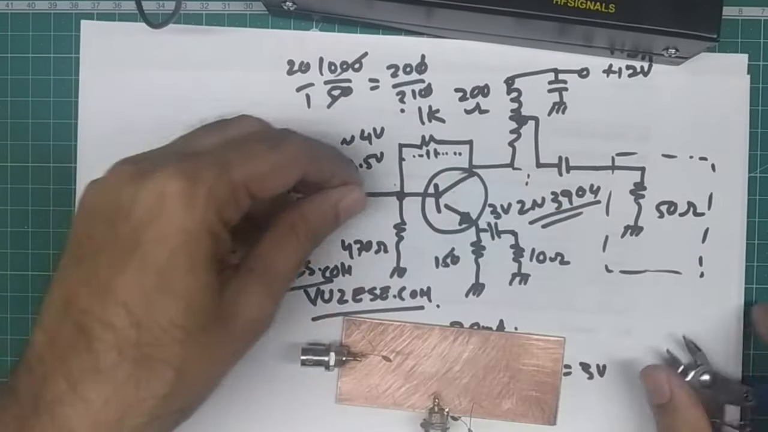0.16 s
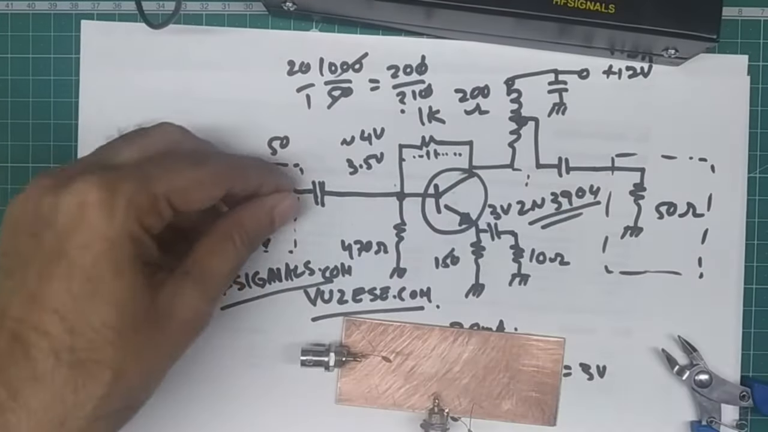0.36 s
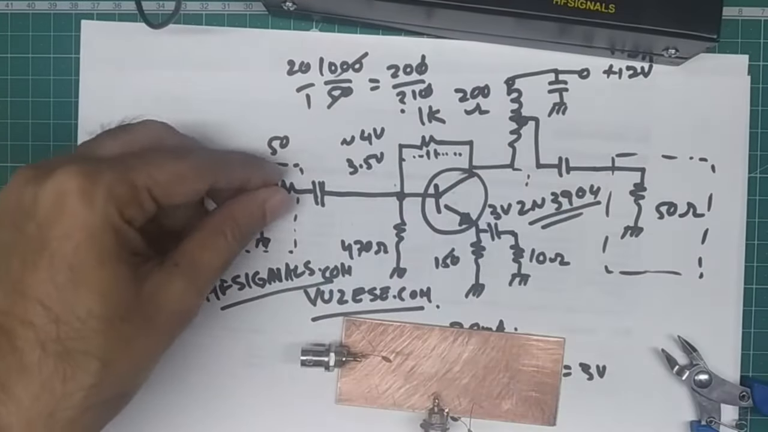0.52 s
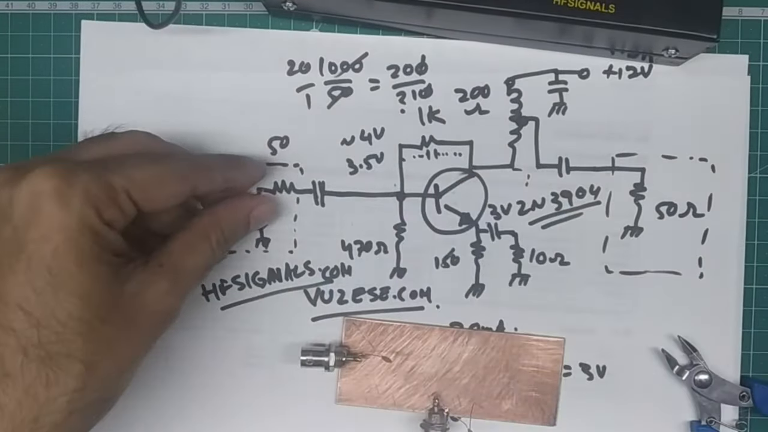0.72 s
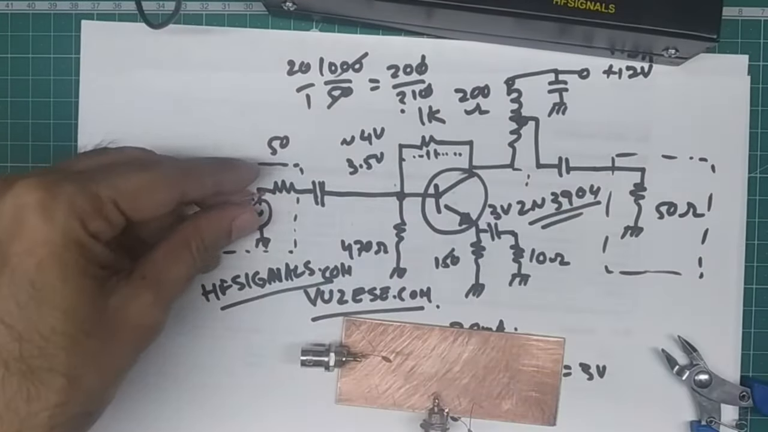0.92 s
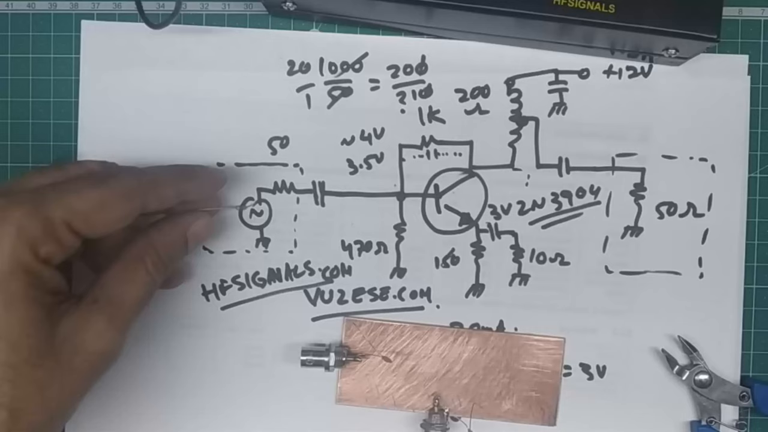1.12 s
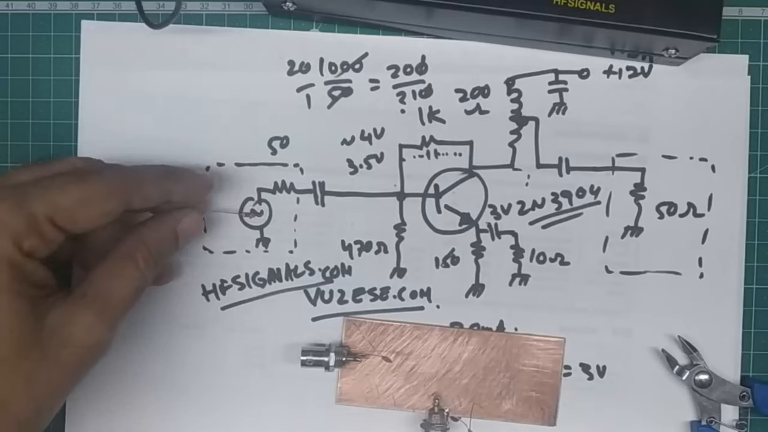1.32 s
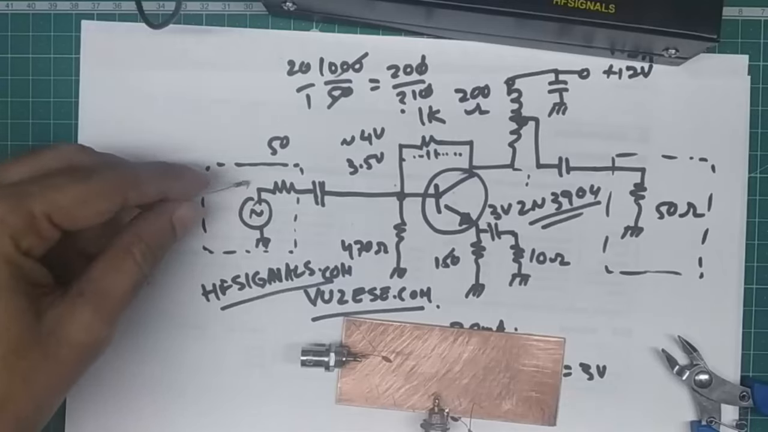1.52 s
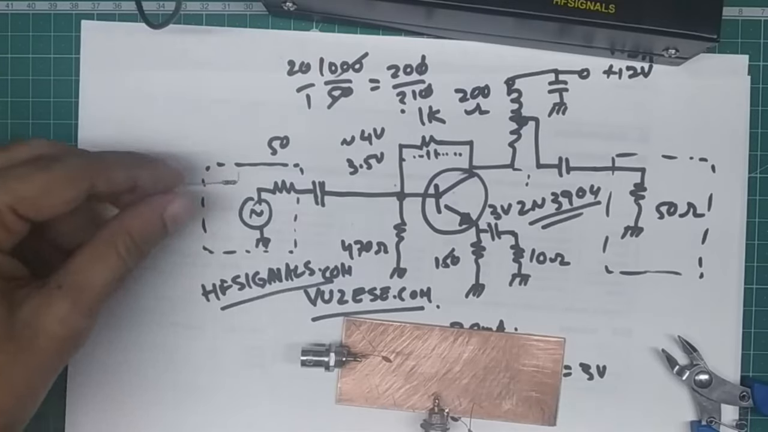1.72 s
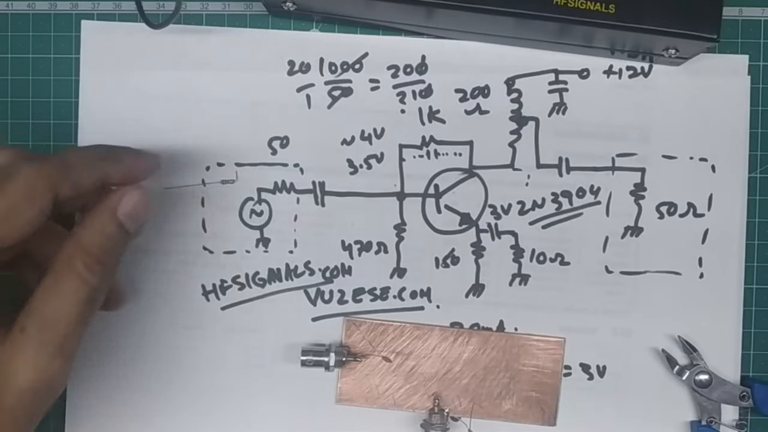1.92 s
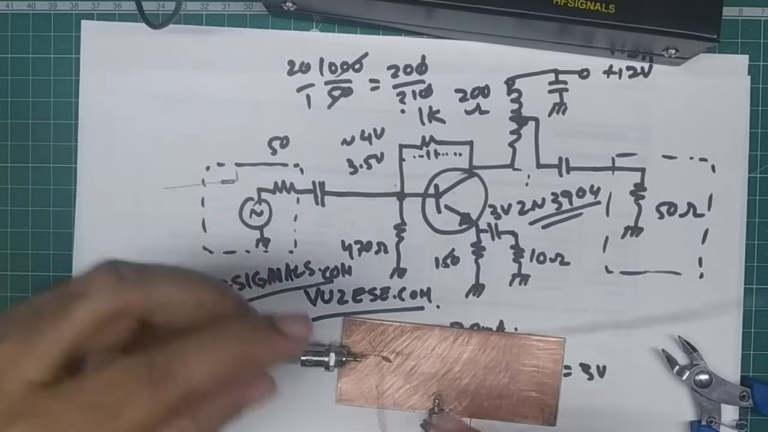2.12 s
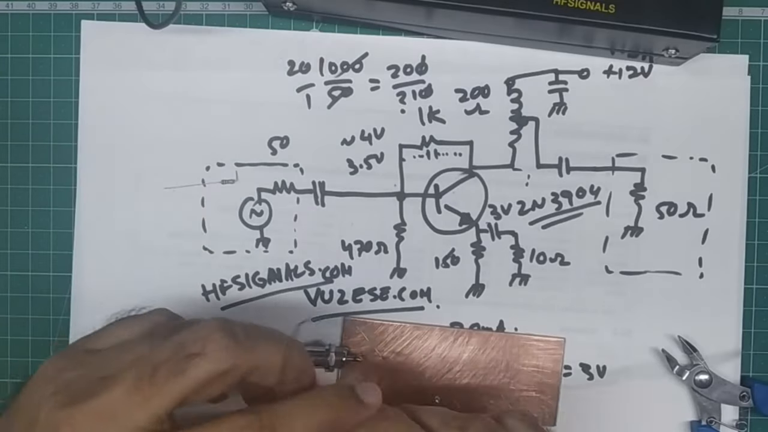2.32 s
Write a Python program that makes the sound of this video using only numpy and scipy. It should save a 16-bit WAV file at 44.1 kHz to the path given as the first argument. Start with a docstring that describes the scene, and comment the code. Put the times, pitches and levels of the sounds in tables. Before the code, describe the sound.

A close clack and thump as small cutters land on a bench and settle. Soft paper rubbing and light ticks of wire leads follow, one springing free with a ping, over the faint rumble and hiss of a small room.

```python
"""Small side cutters clack down on a paper-covered workbench: steel jaws first, then the handles,
which rock and settle, each contact thumping the bench top. Fingers then slide over the paper and
pick at a small component, whose thin wire leads catch, tick and ping. Midway one lead springs free;
from there the hand bumps the bench softly and a fingertip gives one faint squeak.
Throughout, a small room answers, and a low rumble, a hum and a faint hiss lie underneath."""
import sys
import numpy as np
from scipy import signal
from scipy.fft import rfft, irfft, next_fast_len
from scipy.io import wavfile
from scipy.ndimage import map_coordinates

SR = 44100
rng = np.random.default_rng(int(sys.argv[2]) if len(sys.argv) > 2 else 0)


def to_wav(sig):
    """Store sig (one row per channel, or 1-D mono) as 16-bit WAV at the path in sys.argv[1].

    Samples outside -1..1 are clipped; the rate is SR.
    """
    pcm = np.clip(np.atleast_2d(sig), -1, 1) * 32767
    pcm = np.round(pcm).astype(np.int16)
    wavfile.write(sys.argv[1], SR, pcm.T)  # frames by channels


N = 103635
HIT_SAMPLES = SR // 2  # the longest one contact may last

# tone of the bench thud, the handle clack and the jaw tick: freq_hz, level_db
THUD_EQ = [(30, -14.5), (110, -3), (200, 1), (290, 5.5), (450, -9), (680, 0), (900, -9), (1150, -8.5),
           (1600, -6.5), (3000, -19.5), (8000, -46)]
CLACK_EQ = [(100, -25.5), (600, -5), (1300, -9.5), (1600, -7.5), (1900, 2.5), (2300, 1), (2850, 1),
            (3300, -11), (5000, -18), (9000, -33), (15000, -67.5)]
TICK_EQ = [(300, -38), (2000, 0), (4500, -1), (6000, -7.5), (8300, -1.5), (10500, -8), (12000, -14),
           (13500, -12), (16000, -42.5)]
# low resonances of bench and room that ring after each thud: pitch_hz, level_db, t60_s
THUD_MODES = [(45.7, -21, 0.74), (113, -13.5, 0.6), (170.6, -13.5, 0.38), (244.6, -15, 0.12),
              (274, -9.5, 0.15), (310, -10.5, 0.16), (668.4, -14.5, .14), (866, -15, .06)]
# resonances of the cutters' frame: pitch_hz, level_db, t60_s
FRAME_MODES = [(1863, -19, 0.075), (2280, -13.5, 0.054), (2610, -18, 0.097), (2904, -19, 0.029)]
# the cutters land, rock and settle: start_s, thud_db, clack_db, tick_db
CUTTER_HITS = [(.2200, -41, -22, -8), (.2223, 1, -3, -16), (0.2617, -12, -6, -13.5),
               (0.2628, -18, -11, -7.5), (.2670, -3, 2, -5.5), (0.2708, -2, -5, -11.5),
               (0.2754, -3.5, -11, -25), (.2844, -11, -5, -10.5), (.2857, -6, -33, -16),
               (.338, -14, -33, -39), (.375, -14.5, -38, -24.5)]


def cutters():
    """Every contact thumps the bench, clacks the handles and ticks the steel jaws."""
    body, jaws = np.zeros((2, N)), np.zeros((2, N))
    for start_s, thud_db, clack_db, tick_db in CUTTER_HITS:
        thud = contact(THUD_EQ, scatter_db=0, t60_s=0.063) + ring(THUD_MODES, spread_rad=0.12)
        clack = contact(CLACK_EQ, scatter_db=-5, t60_s=0.013) + ring(FRAME_MODES, spread_rad=0.72)
        add(body, start_s, amp(thud_db) * thud + amp(clack_db) * pan(0.89) * clack)
        add(jaws, start_s, amp(tick_db) * contact(TICK_EQ, scatter_db=1, t60_s=0.011))
    landing = room(body, wet_db=-14, build_s=0.017) + room(jaws, wet_db=-11, build_s=0.004)
    lag_s = np.array([[0], [0.00011]])  # the left side hears them first
    return pan(0.5) * filtered(landing, lambda hz: np.exp(-2j * np.pi * hz * lag_s))


# bright tone of a tiny snap, of wire or of paper fibre: freq_hz, level_db
SNAP_EQ = [(100, -5), (700, -15), (1600, -19), (2300, -3.5), (3200, -8), (6000, -2.5), (8500, 1),
           (10500, -1), (12500, -2), (15500, -10.5)]


def wire_click(tilt_db, crack_t60_s=0.004, scatter_t60_s=0.045):
    """A dry crack of wire and its softer scatter, tilted by tilt_db per octave, energy 1."""
    t = np.arange(SR // 12) / SR
    burst = diffuse(len(t)) * (decay(t, crack_t60_s) + amp(-11) * decay(t, scatter_t60_s))
    tilted_eq = [(hz, db + tilt_db * np.log2(hz)) for hz, db in SNAP_EQ]
    click = signal.fftconvolve(burst, pulse(tilted_eq)[None], axes=1)
    return click / stereo_norm(click)


# resonances of a ticking lead and of the one that springs free: pitch_hz, level_db, t60_s
LEAD_MODES = [(3650, -18, .2), (5010, -13, .24), (5520, -7.5, 0.23), (6760, -6, 0.23), (7883, -9, .22),
              (8620, -7.5, 0.18), (10470, -5.5, 0.18), (15200, -13, .2)]
SPRUNG_MODES = [(2167, -11, .18), (2420, -14, .12), (3620, -9.5, 0.14), (4980, -15, .12), (6280, -16, .14),
                (8300, -11, .14), (9330, -2.5, .14), (10420, -3.5, 0.061), (12800, -16, 0.081),
                (13700, -5, 0.068)]
# ticks of the leads: start_s, click_db, ring_db, tilt_db_per_octave, pan_db
LEAD_TICKS = [(.5585, -35, -50, 3, 6), (.670, -25, -32, 2, 3), (0.7113, -27.5, -43, -1.5, 8),
              (0.7242, -26, -34, 1, 5), (.733, -18.5, -19, 8, 5.5), (.833, -36, -39, -8, -1),
              (1.067, -33.5, -37, -2.5, 10), (1.094, -21.5, -30, -0.5, 9), (1.1374, -25.5, -33, -1, 13.5),
              (1.1503, -15, -38, 0.5, -0.5), (1.159, -22.5, -38, -0.5, 8), (1.2084, -11.5, -21, 2, 3.5),
              (1.247, -25.5, -25, -1, 3), (1.434, -40, -55, 1, 0), (1.686, -27, -45, -2.5, 3),
              (1.691, -28.5, -37.5, -2, 2), (1.724, -34, -51, -1.5, 1), (1.8083, -18.5, -54, -0.5, -0.5),
              (2.0513, -31, -51, 0, 4), (2.108, -34, -61, -2, 0), (2.304, -35, -54, -1, 2)]


def wire_leads(jangle_hz=(4890, 15620), jangle_t60_s=0.14, spring_s=1.2084):
    """Wire ends catch and slip, each with a dry click and a thin jangling ping; one springs free."""
    out = np.zeros((2, N))
    weak_modes = [(hz, rng.normal(-16.5, 3), jangle_t60_s) for hz in rng.uniform(*jangle_hz, 64)]
    jangle = ring(weak_modes, spread_rad=1.55)
    for start_s, click_db, ring_db, tilt_db, pan_db in LEAD_TICKS:
        add(out, start_s, pan(pan_db) * amp(click_db) * wire_click(tilt_db))
        ping = ring(LEAD_MODES, spread_rad=1.8) + jangle
        add(out, start_s, pan(pan_db) * amp(ring_db) * ping)
    add(out, spring_s, amp(-14.5) * pan(4) * ring(SPRUNG_MODES, spread_rad=0.8))
    return room(out, wet_db=-14, build_s=0.0023)


# tone of the skin's rub and of the airy hiss above it: freq_hz, level_db
RUB_EQ = [(100, -15), (400, -6.5), (1000, -5.5), (1600, -3.5), (2300, 2), (3300, 1), (4200, 0.5),
          (6000, -2.5), (10000, -5.5), (15000, -13.5)]
HISS_EQ = [(500, -26), (4000, -18), (6000, -11.5), (7300, 0), (8300, 8), (10000, 3.5), (12000, -7.5),
           (15500, -8.5)]
# fingers and wire sliding on paper: start_s, rise_s, fall_s, rub_db, hiss_db
SLIDES = [(0.042, 0.0045, .14, -55, -47.5), (0.063, .045, .055, -44.5, -57),
          (0.553, 0.0083, 0.51, -60.5, -62.5), (0.688, .028, 0.11, -55.5, -57),
          (.76, 0.027, 0.16, -63.5, -60), (1.062, 0.037, 0.061, -48, -51.5), (1.11, 0.047, 0.22, -56, -58),
          (1.224, 0.039, 0.12, -56, -77), (1.3, 0.022, 0.75, -68, -61), (1.503, .004, 0.1, -76, -53),
          (1.56, 0.084, 0.43, -66.5, -61.5), (1.77, 0.018, 0.061, -73.5, -72),
          (2.04, 0.037, 0.16, -59, -80)]


def paper_slides(snaps_per_s=170, fall_db=38.5):
    """Grainy friction on the sheet: a broad rub of skin, tiny snapping fibres and a high hiss."""
    t = np.arange(N) / SR
    rub_env, hiss_env = np.zeros(N), np.zeros(N)
    for start_s, rise_s, fall_s, rub_db, hiss_db in SLIDES:
        swell = np.clip((t - start_s) / rise_s, 0, 1) ** 0.83
        fade = amp(-fall_db * np.maximum(t - start_s - rise_s, 0) / fall_s)
        rub_env += amp(rub_db) * swell * fade
        hiss_env += amp(hiss_db) * swell * fade
    grain = unit_rms(amp(2 * wobble(900) + 2.5 * wobble(90)))
    snaps = (rng.random(N) < snaps_per_s / SR) * rng.uniform(0.48, 1, N)
    snap_env = signal.fftconvolve(snaps, decay(t[:SR // 50], t60_s=0.0071))[:N]
    grit = unit_rms(snap_env * noise(SNAP_EQ))
    rub = pan(0.82) * rub_env * (grain * noise(RUB_EQ) + amp(-7) * grit)
    hiss = pan(0.8) * hiss_env * grain * noise(HISS_EQ)
    return room(rub + hiss, wet_db=-11.5, build_s=0.015)


# tone of the narrow squeak and of a dull bump: freq_hz, level_db
SQUEAK_EQ = [(700, -37), (1080, -20), (1220, -2), (1400, -14), (2000, -20), (4000, -40)]
BUMP_EQ = [(25, 1.5), (50, -4), (110, -5.5), (240, -3), (400, -13.5), (1000, -17.5), (4000, -55)]
# the hand meets the bench: start_s, level_db
HAND_BUMPS = [(1.213, -27), (1.683, -35.5), (1.795, -31)]


def hand(squeak_s=1.617, squeak_width_s=0.0055):
    """The hand bumps the bench softly, and a fingertip sticks briefly with one faint squeak."""
    t = np.arange(N) / SR
    squeak_env = np.exp(-0.5 * ((t - squeak_s) / squeak_width_s) ** 2)
    out = amp(-61.5) * squeak_env * noise(SQUEAK_EQ)
    for start_s, level_db in HAND_BUMPS:
        add(out, start_s, amp(level_db) * contact(BUMP_EQ, scatter_db=10.5, t60_s=0.13))
    return room(out, wet_db=-11, build_s=0.0068)


# reverb time of the small room: freq_hz, t60_s
ROOM_DECAY = [(100, 1), (300, 0.76), (1000, 0.79), (2500, .5), (8000, 0.53), (15000, 0.44)]


def room(x, wet_db, build_s):
    """The sound plus the room's tail, which builds up and lingers longest in the bass."""
    hz, t, bands = signal.stft(diffuse(SR), SR, nperseg=256)
    envelope = decay(t, curve_at(ROOM_DECAY, hz)[:, None]) * (1 - np.exp(-t / build_s))
    tail = signal.istft(bands * envelope, SR, nperseg=256)[1]
    tail /= np.linalg.norm(tail[0])
    return x + amp(wet_db) * signal.fftconvolve(x, tail, axes=1)[:, :N]


# tone of the noise bed: freq_hz, level_db
BED_EQ = [(20, -0.5), (40, 1.5), (70, -7), (120, -16.5), (175, -11), (260, -22), (500, -25), (1500, -31.5),
          (3000, -29.5), (6000, -33.5), (8500, -28.5), (12000, -32), (16000, -35.5)]
# low tones of the hum: pitch_hz, level_db
HUM_TONES = [(48.7, -63), (100, -71), (171, -72.5)]


def room_tone():
    """Low rumble, faint hiss and a wavering hum."""
    t = np.arange(N) / SR
    hum = sum(amp(db) * np.sqrt(2) * np.sin(2 * np.pi * hz * t + 0.5 * wobble(4.96))
              for hz, db in HUM_TONES)
    return pan(0.6) * (amp(-58) * noise(BED_EQ) + hum)


def contact(eq, scatter_db, t60_s):
    """One sharp pulse and its scatter off things nearby, which dies over t60_s; energy 1."""
    t = np.arange(HIT_SAMPLES) / SR
    burst = np.pad(diffuse(SR // 10), ((0, 0), (0, HIT_SAMPLES - SR // 10)))
    burst *= decay(t, t60_s) * (1 - np.exp(-t / 0.0011))
    burst *= amp(scatter_db) / stereo_norm(burst)
    burst[:, 0] -= 1  # the direct hit
    hit = signal.fftconvolve(burst, pulse(eq)[None], axes=1)[:, :HIT_SAMPLES]
    return hit / stereo_norm(hit)


def ring(modes, spread_rad):
    """Damped modes whose levels set their energy; random left and right phases add width."""
    t = np.arange(HIT_SAMPLES) / SR
    out = np.zeros((2, len(t)))
    for hz, db, t60_s in modes:
        fade = decay(t, t60_s)
        gain = amp(db + rng.normal(0, 1)) / np.sqrt(np.sum(fade ** 2) / 2)
        phase = spread_rad * rng.standard_normal((2, 1))
        out += gain * fade * np.sin(2 * np.pi * hz * t + phase)
    return out


# how alike left and right are in diffuse sound: freq_hz, correlation
STEREO_LIKENESS = [(50, 0.76), (180, 0.85), (350, 0.69), (700, 0.3), (1500, 0.034), (15000, .02)]


def diffuse(n):
    """White stereo noise, narrow in the bass and wide in the treble."""
    def mid_side_gains(hz):
        angle = np.arccos(np.clip(curve_at(STEREO_LIKENESS, hz), -1, 1)) / 2
        return np.array([np.cos(angle), np.sin(angle)])
    mid, side = filtered(rng.standard_normal((2, n)), mid_side_gains)
    return np.array([mid + side, mid - side])


def noise(eq):
    """Coloured stereo noise of rms 1."""
    return unit_rms(filtered(diffuse(N), lambda hz: amp(curve_at(eq, hz))))


def pulse(eq, size=2048):
    """Minimum-phase pulse of energy 1 with this tone."""
    cepstrum = irfft(np.log(amp(curve_at(eq, np.fft.rfftfreq(size, 1 / SR)))))
    cepstrum[1:size // 2] *= 2
    cepstrum[size // 2 + 1:] = 0
    wave = irfft(np.exp(rfft(cepstrum)))
    return wave / np.linalg.norm(wave)


def filtered(x, response):
    """Shape x with a frequency response."""
    n = x.shape[-1]
    padded = next_fast_len(n + SR // 10)
    return irfft(rfft(x, padded) * response(np.fft.rfftfreq(padded, 1 / SR)), padded)[..., :n]


def curve_at(points, hz):
    """Read (freq_hz, value) points on a log frequency axis."""
    freqs, values = np.transpose(points)
    return np.interp(np.log(hz + 1), np.log(freqs + 1), values)


def wobble(knots_per_s):
    """A smooth random curve."""
    knots = rng.standard_normal(int(N * knots_per_s / SR) + 4)
    return map_coordinates(knots, [np.arange(N) * knots_per_s / SR])


def amp(db):
    """Decibels to gain."""
    return 10 ** (np.asarray(db) / 20)


def decay(t, t60_s):
    """A fade of 60 dB every t60_s."""
    return amp(-60 * t / t60_s)


def unit_rms(x):
    """Scale to rms 1."""
    return x / np.sqrt(np.mean(x ** 2) + 1e-20)


def stereo_norm(x):
    """Root of the mean energy of the two channels."""
    return np.sqrt(np.sum(x ** 2) / 2)


def pan(db):
    """Stereo gains with the left louder by db."""
    return amp(np.array([[db], [-db]]) / 2)


def add(track, start_s, sound):
    """Mix a sound into the track at start_s."""
    i = round(start_s * SR)
    track[:, i:i + sound.shape[-1]] += sound[..., :N - i]


def scene():
    """The cutters and the handwork over the room tone."""
    return cutters() + wire_leads() + paper_slides() + hand() + room_tone()


def record(dry):
    """A steep high cut takes off the topmost air."""
    cutoff_hz = 16200
    return filtered(dry, lambda hz: 1 / np.sqrt(1 + (hz / cutoff_hz) ** 160))


dry = scene()
out = record(dry)
to_wav(out)
```